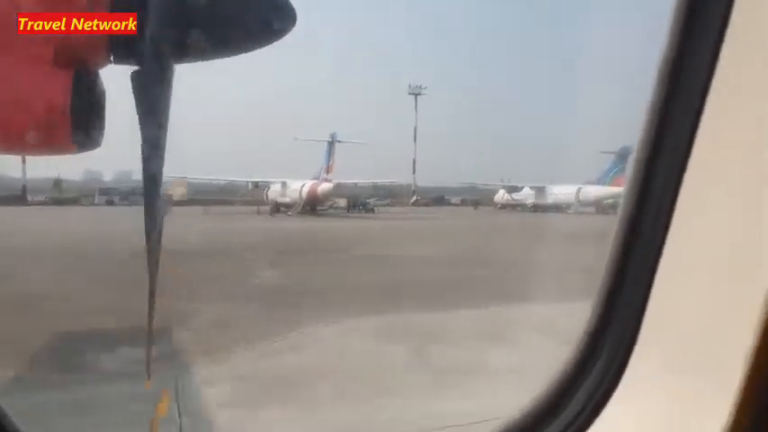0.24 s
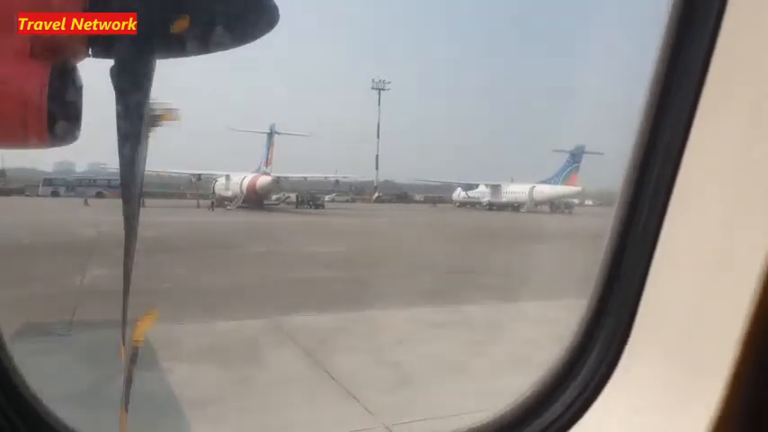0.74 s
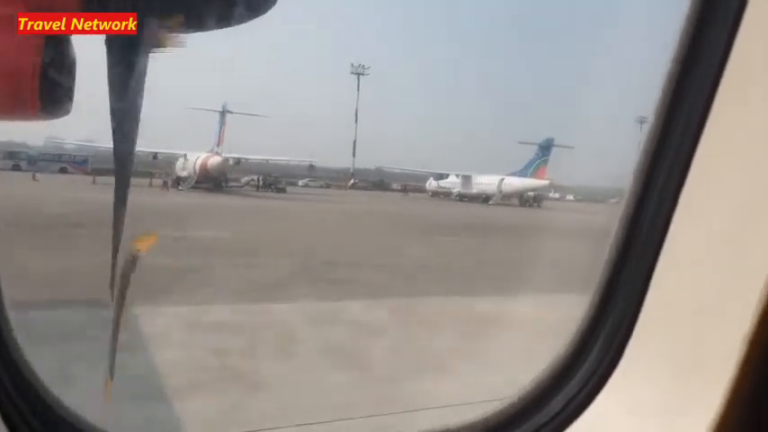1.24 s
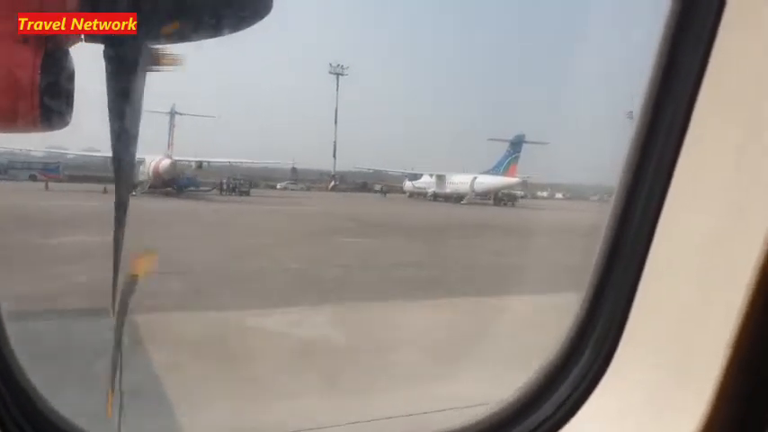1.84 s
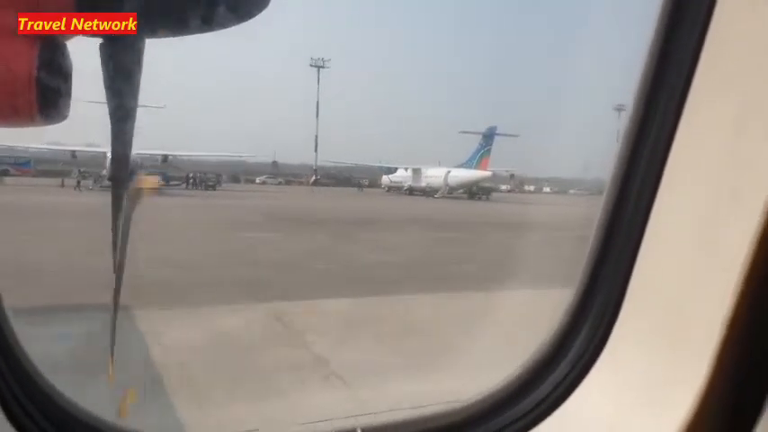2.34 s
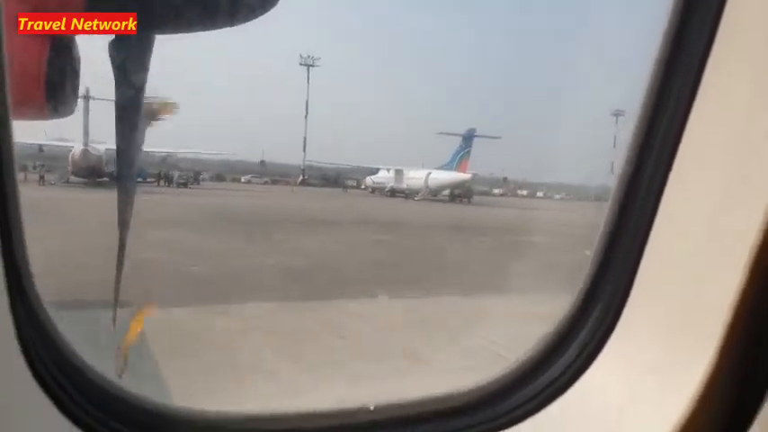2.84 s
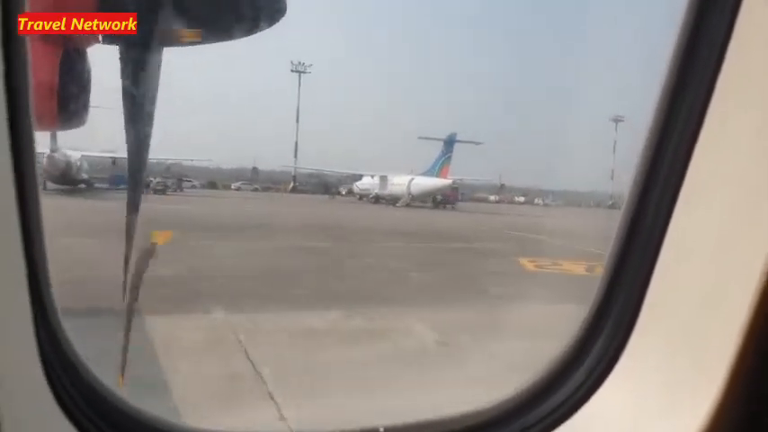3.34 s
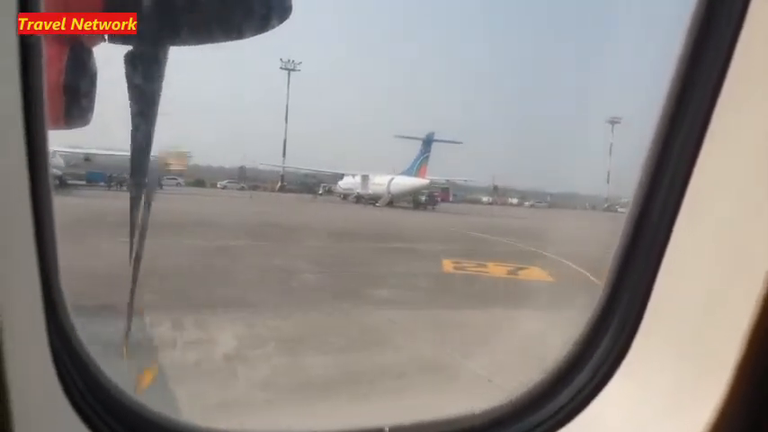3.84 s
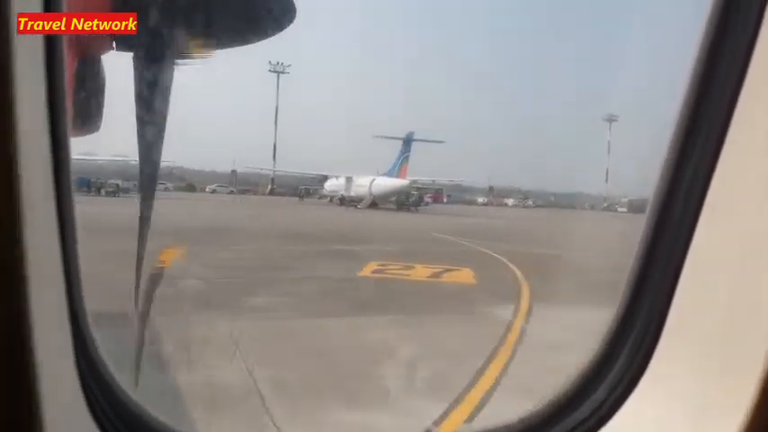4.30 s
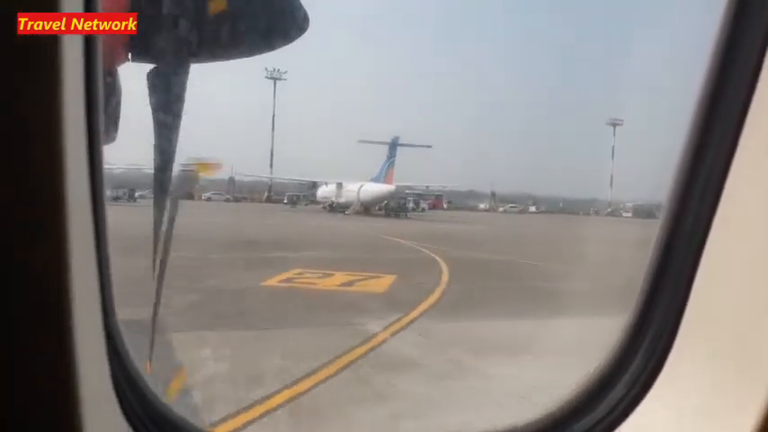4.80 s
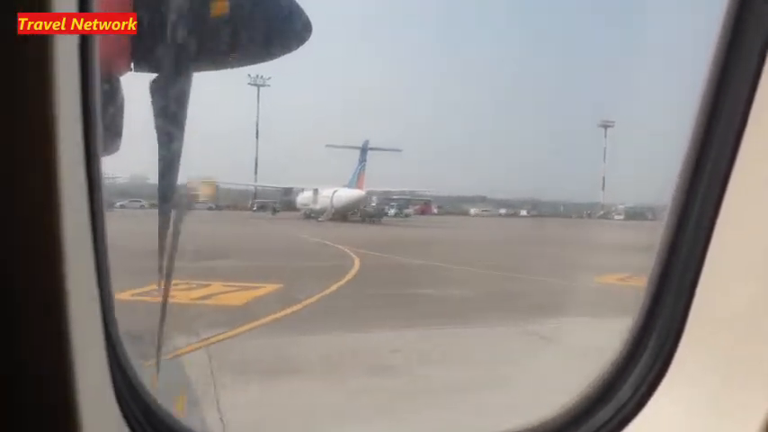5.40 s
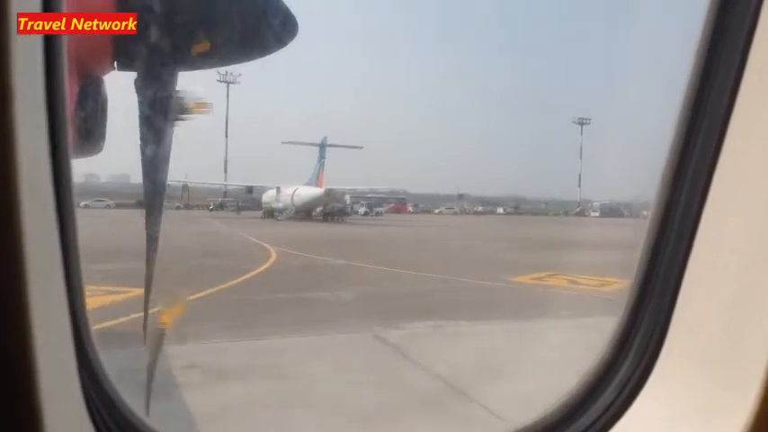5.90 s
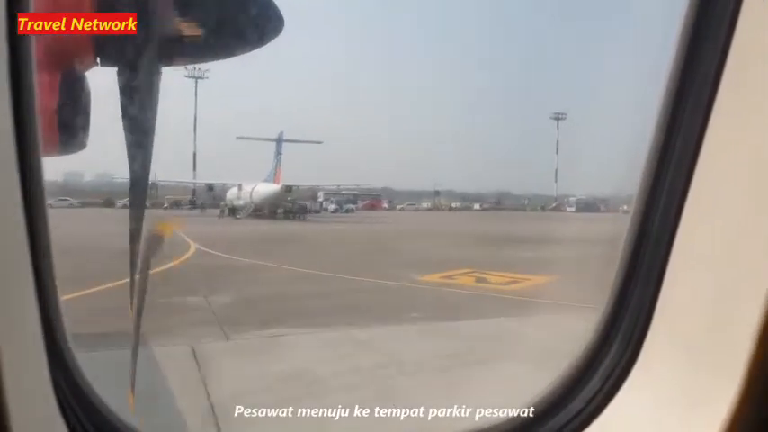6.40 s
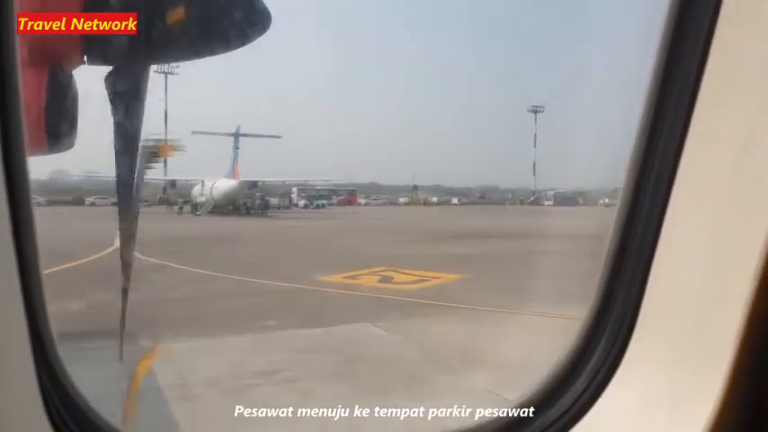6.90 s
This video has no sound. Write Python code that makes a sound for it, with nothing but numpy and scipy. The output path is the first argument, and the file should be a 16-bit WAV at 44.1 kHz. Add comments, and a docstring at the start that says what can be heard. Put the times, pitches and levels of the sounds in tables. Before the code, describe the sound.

Continuous turboprop drone heard through the cabin wall during slow taxiing. The sound is bass-heavy and muffled: a blurred propeller hum, lumpy low rumble and booming that surge and dip several times a second. Soft cabin air and engine hiss flickers far underneath, with barely noticeable machinery whine and short faint puffs. The handheld microphone sits near the window, giving an enclosed, full stereo sound with little echo.

```python
"""Propeller of a taxiing turboprop, heard in the cabin by the window: blades chop turbulent air into fuzzy
noise humps at multiples of the blade rate, over a gusting wash. The fuselage adds rumble, boom and a
blade-rate throb as noise bands; faint machinery sines whine over the flickering noise of engine and
cabin air, with short flares and whooshes. Two microphone ports hear the bass alike and the treble apart."""
import sys
import numpy as np
from scipy import signal
from scipy.fft import rfft, irfft, next_fast_len
from scipy.io import wavfile
from scipy.ndimage import uniform_filter1d

SR = 44100
rng = np.random.default_rng(int(sys.argv[2]) if len(sys.argv) > 2 else 0)


def waveform_to_disk(signal):
    """Save audio, clipped to [-1, 1], as 16-bit WAV at the path in sys.argv[1]."""
    frames = np.transpose(np.atleast_2d(signal))
    scaled = np.clip(frames, -1, 1) * 32767
    samples = np.round(scaled).astype(np.int16)
    wavfile.write(sys.argv[1], SR, samples)


N = 315315
BLADE_HZ = 83.23

# swell of hiss, machinery and wash: [t/s, hiss level/dB, wash re hiss/dB before trim and gusts]
SWELL = [(0.0, -44.5, 25.5), (0.45, -44.5, 23), (0.89, -45.5, 23), (1.34, -43, 25), (1.79, -42.5, 21.5),
         (2.23, -42.5, 25), (2.68, -44, 25), (3.13, -44, 22), (3.58, -44, 24), (4.02, -42.5, 24.5),
         (4.47, -43, 25.5), (4.92, -42.5, 22.5), (5.36, -42, 25), (5.81, -43, 22), (6.26, -42.5, 25),
         (6.7, -43, 23), (7.15, -43, 25.5)]


def propeller():
    """Blades cut each eddy in turn: noise gathers at blade-rate multiples, long eddies give narrow cores."""
    # humps: [multiple of blade rate, relative density/dB, width/Hz above the top, core power re hump/dB]
    blades = [(2, 1.5, 5.66, -0.5), (3, -0.5, 14, 2.5), (4, -8.5, 18.5, 0), (5, -9, 15.1, 0.5),
              (6, -19, 31.6, 4.5), (7, -25, 24, 1), (8, -28, 13.6, -10), (9, -29.5, 17.6, -10),
              (10, -37, 15, -4), (11, -40.5, 22, -6)]
    # slow hump levels: [t/s, relative level/dB of multiples 2, 3, 4, 5, 6 and above]
    cores = [(0.0, 1, -4, -10, -1.5, 2), (0.36, -10, -1.5, 1.5, -3.0, -1.5),
             (0.72, -14, 0.5, -10, -2.5, -1.5), (1.08, 0, -3, -2.5, -1.5, 0.0), (1.44, 0, 1.0, 2, 0, -1.5),
             (1.8, 2, 0.5, -3.5, 0.5, 0.0), (2.16, 5, 0.0, 6, -2, 0), (2.52, 3.5, -1, -1.5, -2, -1),
             (2.88, 6, 3.5, -3.5, 1.5, 2.5), (3.24, 2.5, -4.5, 0.5, -6, -2), (3.6, 3.5, -2, -2, 0.5, -0.5),
             (3.96, -6, -1, 5.5, -3, 2), (4.32, 0.5, -0.5, 0, -3.5, 1), (4.68, 0, 3.5, 1.0, -0.5, -2.5),
             (5.04, -5, 1.5, -2, 3.5, 1.5), (5.4, 1, 1.5, 2, -3.5, 1.5), (5.76, 0, 0.5, 2, 3.5, 1),
             (6.12, -4, 2.5, 5.0, 1.5, 1), (6.48, -8, 1, -4.5, 1.5, 1.5), (6.84, 5.5, 2, 3.5, -2.5, 1.5),
             (7.15, -5, -1.0, -3, -6, 0)]
    # wash between the humps: [f/Hz, relative density/dB per Hz]
    wash_shape = [(110, -15.5), (145, -4), (200, -5), (240, -10), (270, -12), (360, -16), (450, -20),
                  (530, -26.5), (625, -25.5), (700, -33), (1000, -59), (1400, -74), (3000, -110)]
    low_side = 2.33  # width ratio, below the top to above
    core_share = 0.37  # core width re hump width
    weave_db, weave_hz = 2, 4.6
    pitch_drift, drift_hz = .005, 1.597  # rms share of pitch, common to all humps
    humps_db, wash_trim_db = -22.5, -3
    gust_db, gust_hz = 1.03, 6.1

    total = sum(gain_of(2 * db) * width_hz for _, db, width_hz, _ in blades)
    humps = 0
    for multiple, db, width_hz, core_db in blades:
        top_hz = multiple * BLADE_HZ

        def spectrum(hz):
            broad = hump(hz, top_hz, width_hz, low_side)
            core = hump(hz, top_hz, core_share * width_hz) / core_share
            return np.sqrt(broad + gain_of(2 * core_db) * core)

        band = steadied(noise(spectrum), .2)
        slow_db = over_time(cores, column=min(multiple - 1, 5))
        level_db = db + slow_db + weave_db * wander(weave_hz)
        humps = humps + gain_of(level_db) * np.sqrt(width_hz / total) * band

    # uneven reading speed drifts the pitch
    position = np.arange(N) + np.cumsum(pitch_drift * wander(drift_hz))
    humps = np.array([np.interp(position, np.arange(N), port) for port in humps])

    wash = steadied(shaped_noise(wash_shape), 0.21)
    wash_db = over_time(SWELL, column=1) + over_time(SWELL, column=2)
    wash_db = wash_db + wash_trim_db + gust_db * wander(gust_hz)
    return gain_of(humps_db) * humps + gain_of(wash_db) * wash


def fuselage():
    """Broad rumble, narrower boom and blade-rate throb: noise bands that vary apart and surge together."""
    # rumble: [f/Hz, relative density/dB per Hz]
    rumble_shape = [(12, -34), (25, -27), (38, -13), (48, -11), (58, 1), (65, 2), (74, -2), (80, -5),
                    (93, -7), (103, -7), (115, -25), (200, -90)]
    # boom resonances: [f/Hz, width/Hz, relative density/dB]
    boom_modes = [(110, 11, -6.5), (126, 10.3, -3), (135, 16, -13)]
    # steadier narrow note inside the boom: [f/Hz, width/Hz, level re boom/dB]
    boom_core = (125.6, 4, -3)
    # slow levels before lumps and surges: [t/s, rumble/dB, boom/dB, throb/dB]
    bass = [(0.0, -15, -20.5, -14), (0.15, -27, -21, -33), (0.3, -33, -21, -17.5), (0.45, -29, -18.0, -35),
            (0.6, -21, -19, -31), (0.75, -22, -17, -22), (0.9, -10.5, -26, -19), (1.05, -30, -18, -22.0),
            (1.2, -26, -24, -21.5), (1.35, -19, -14.5, -23.5), (1.5, -21.5, -22.5, -30),
            (1.65, -17.5, -16, -21), (1.8, -22, -20, -27), (1.95, -19, -15.5, -19), (2.1, -25, -20.5, -27),
            (2.25, -15, -17.5, -21), (2.4, -17.5, -18, -18), (2.55, -16, -16.5, -19), (2.7, -21, -23, -27),
            (2.85, -21, -18, -28.0), (3.0, -23, -18.0, -26.0), (3.15, -24.0, -17.5, -19.5),
            (3.3, -25, -20.5, -22), (3.45, -23, -21.5, -31), (3.6, -21, -19, -23),
            (3.75, -23.5, -13.5, -31), (3.9, -19.5, -25.5, -30.0), (4.05, -22, -22, -34),
            (4.2, -20, -21, -26), (4.35, -18, -23.5, -16.5), (4.5, -29, -20, -27), (4.65, -18, -18.5, -19),
            (4.8, -15.5, -15.5, -29), (4.95, -20, -14, -35), (5.1, -28, -16.5, -33),
            (5.25, -20.5, -19, -24.0), (5.4, -20, -18, -13.5), (5.55, -25, -21, -23),
            (5.7, -22, -18.5, -23), (5.85, -26, -13.5, -35), (6.0, -31, -19, -26), (6.15, -17.5, -19, -27),
            (6.3, -27, -17.5, -25), (6.45, -21.5, -29, -20), (6.6, -22, -20, -28.0),
            (6.75, -21, -17.5, -31), (6.9, -26, -17.5, -22), (7.05, -24, -13.5, -28.5),
            (7.15, -32, -14, -34)]
    # brief surges and dips: [t/s, change/dB]
    surges = [(.23, -11), (.65, -8), (.72, 3.5), (1.39, -15), (1.62, 3), (2.17, 8.5), (2.44, 3), (3.31, 10),
              (3.36, -9), (3.77, 0), (3.91, -4), (4.88, -9), (4.98, 4.5), (5.8, -6), (6.18, 5), (6.27, 5.5),
              (6.52, -9)]
    surge_s = 0.025  # half length, to 1/e of the change
    lump_db, lump_hz = 0.5, 11.6
    throb_width_hz = 7

    def boom_spectrum(hz):
        return np.sqrt(sum(gain_of(2 * db) * hump(hz, top_hz, width_hz) for top_hz, width_hz, db in boom_modes))

    def lumpy_gain(column):
        return gain_of(over_time(bass, column) + lump_db * wander(lump_hz))

    t = np.arange(N) / SR
    surge_db = sum(db * np.exp(-((t - s) / surge_s) ** 2) for s, db in surges)

    rumble = steadied(shaped_noise(rumble_shape), 0.064)
    boom = steadied(noise(boom_spectrum), 0.09)
    note_hz, note_width_hz, note_db = boom_core
    note = steadied(noise(lambda hz: np.sqrt(hump(hz, note_hz, note_width_hz))), 0.32)
    boom = boom + gain_of(note_db) * note
    throb = steadied(noise(lambda hz: np.sqrt(hump(hz, BLADE_HZ, throb_width_hz))), 0.23)

    bass_sum = lumpy_gain(1) * rumble + lumpy_gain(2) * boom + lumpy_gain(3) * throb
    return gain_of(surge_db) * bass_sum


def machinery():
    """Thin sine tones whose strength and phase waver at random."""
    # tones: [f/Hz, level re hiss/dB, waver rate/Hz, left-right/dB, rms level waver/dB]
    tones = [(206.1, 9.5, 3.5, 2.5, 4), (375.5, -4, 2.2, 4, 4), (1030.4, -16, 1.6, 3, 2),
             (1236, -26, 4, 1.5, 4), (1509, -25, 5, 6, 4), (5156, -28, 15, -1.5, 4)]
    phase_waver_rad = 1.16  # rms
    t, out = np.arange(N) / SR, np.zeros((2, N))
    for hz, db, waver_hz, lean_db, waver_db in tones:
        phase = 2 * np.pi * hz * t + phase_waver_rad * wander(waver_hz)
        tone = np.sin(phase) * gain_of(db + waver_db * wander(waver_hz))
        sides = gain_of([[lean_db / 2], [-lean_db / 2]])
        out += np.sqrt(2) * tone * sides
    return out


def hiss():
    """Engine and air noise in two patchy bands that flicker together, the top more than the middle."""
    # middle band: [f/Hz, relative density/dB per Hz]
    middle_shape = [(300, -50), (800, 3), (1060, 1.5), (1140, 1), (1280, -2.5), (1450, -1), (1860, -3.5),
                    (2100, -1), (2450, -2.5), (2750, -3.5), (3100, -5.5), (3900, -6.5), (4320, -3),
                    (5200, -8), (5750, -5.5), (6300, -10.5), (7500, -11), (8500, -36.5)]
    # thin top band: [f/Hz, relative density/dB per Hz]
    top_shape = [(6500, -40), (7800, 1), (8200, 1), (9800, -2), (10800, 1), (13500, -1), (14300, -3),
                 (15000, -6), (15300, -11), (16000, -12)]
    top_db = -14.5
    flicker = evened(wander(22) + .4 * wander(80))
    middle = patchy(shaped_noise(middle_shape), depth_db=1.1, wide_db=0.68)
    top = patchy(shaped_noise(top_shape), depth_db=2.4, wide_db=.6)
    top = gain_of(.8 * flicker + .4 * wander(20)) * top
    return gain_of(0.52 * flicker) * middle + gain_of(top_db) * top


def flares():
    """Short bright flares and longer dull whooshes: noise bursts with a quick rise and softer fall."""
    # flares: [onset t/s, level/dB]
    flare_onsets = [(0.022, -43), (1.608, -44), (1.925, -44), (2.004, -42), (2.291, -47), (2.335, -43.5),
                    (2.916, -45), (4.238, -43), (5.135, -45), (5.298, -50.5), (5.381, -45), (6.1, -45),
                    (6.49, -48), (6.873, -50)]
    # flare colour: [f/Hz, relative density/dB per Hz]
    flare_shape = [(600, -50), (1600, 0), (3000, -5), (6000, -9), (9000, -16), (15000, -21)]
    # whooshes: [onset t/s, level/dB, rise/s]
    whooshes = [(.025, -42.5, 0.02), (.5, -50, 0.028), (.61, -47, 0.015), (.69, -47, .012),
                (1.36, -50, .015), (1.58, -53, 0.033), (2.27, -49.5, .025), (2.45, -47, 0.016),
                (3.68, -48, 0.019), (4.28, -51, .015), (4.74, -47, 0.02), (5.5, -47, 0.014)]
    # whoosh colour: [f/Hz, relative density/dB per Hz]
    whoosh_shape = [(700, -40), (1250, 1), (1650, 0), (2500, -1), (3200, -8), (4000, -11), (6000, -12),
                    (8000, -36)]
    flare_rise_s = 0.0079
    flare_rows = [(s, db, flare_rise_s) for s, db in flare_onsets]
    return bursts(flare_rows, flare_shape) + bursts(whooshes, whoosh_shape)


def bursts(rows, colour):
    """Coloured noise under envelopes that peak rise_s after onset; rows of (s, level dB, rise s)."""
    t, envelope = np.arange(N) / SR, np.zeros(N)
    for s, db, rise_s in rows:
        u = np.maximum(t - s, 0) / rise_s
        envelope += gain_of(db) * u * np.exp(1 - u)
    return envelope * shaped_noise(colour)


def noise(gain):
    """Noise of amplitude spectrum gain(hz) at the two ports; their mean has unit rms."""
    # likeness of the ports: [f/Hz, correlation before the phase lead]
    likeness = [(60, .995), (200, .985), (290, .93), (400, .7), (550, .47), (650, .36), (800, .33),
                (920, .2), (1050, 0), (1250, -.26), (1800, -.3), (2700, .15), (3700, -.25), (7000, -.24),
                (8800, -.05), (10000, .2), (11200, .02), (15000, .13)]
    # level balance: [f/Hz, left-right/dB]
    lean = [(40, 1.8), (110, 2.4), (280, 2.7), (420, 8.5), (520, 6.5), (700, 6.3), (1050, -1.2),
            (4500, -1.8), (5700, -5.5), (6800, -1.9), (15000, -1.3)]
    # phase lead of the right port: [f/Hz, phase/rad]
    lead = [(60, -.15), (200, -.15), (330, 0), (450, .6), (550, .65), (650, 1.4), (770, 2.4), (1030, 2.6),
            (1070, 0), (15000, 0)]
    size = next_fast_len(N)
    hz = np.fft.rfftfreq(size, 1 / SR)
    left, other = rfft(rng.standard_normal((2, size)))
    same = np.clip(read(likeness, hz), -1, 1)
    right = same * left + np.sqrt(1 - same ** 2) * other
    right = right * np.exp(1j * read(lead, hz))
    half = gain_of(read(lean, hz) / 2)
    pair = irfft(gain(hz) * np.array([left * half, right / half]), size)[:, :N]
    return pair / np.std(pair.mean(0))


def shaped_noise(points):
    """Port-pair noise with the spectrum of a (Hz, dB per Hz) table."""
    return noise(lambda hz: gain_of(read(points, hz)))


def hump(hz, top_hz, width_hz, low_side=1):
    """Power of a resonance-shaped band with its top at 1, low_side times wider below the top."""
    width_hz = np.where(hz < top_hz, low_side * width_hz, width_hz)
    return 1 / (1 + (2 * (hz - top_hz) / width_hz) ** 2) ** 2


def steadied(pair, span_s):
    """Evens out the level over spans of span_s, so that a curve can set it."""
    size = max(round(span_s * SR), 1)
    power = uniform_filter1d(uniform_filter1d(pair.mean(0) ** 2, size), size)
    return pair / np.sqrt(power + 0.038)  # the floor limits the lift of gaps


def patchy(pair, depth_db, wide_db):
    """Lifts and lowers small and large patches of time and frequency at random, alike at both ports."""
    _, _, z = signal.stft(pair, nperseg=512)
    small, wide = rng.standard_normal(z.shape)
    small = uniform_filter1d(uniform_filter1d(small, size=3, axis=0), size=6, axis=1)
    wide = uniform_filter1d(uniform_filter1d(wide, size=7, axis=0), size=40, axis=1)
    patch_db = depth_db * evened(small) + wide_db * evened(wide)
    return signal.istft(z * gain_of(patch_db), nperseg=512)[1][:, :N]


def wander(top_hz):
    """Slow random curve of unit rms, mostly below top_hz."""
    hz = np.fft.rfftfreq(N, 1 / SR)
    return evened(irfft(rfft(rng.standard_normal(N)) / (1 + (hz / top_hz) ** 4), N))


def over_time(table, column):
    """One column of a curve table, a value per sample."""
    rows = np.array(table)
    return np.interp(np.arange(N) / SR, rows[:, 0], rows[:, column])


def read(points, hz):
    """Reads a table along log frequency."""
    f, value = np.transpose(points)
    return np.interp(np.log(hz + 1), np.log(f + 1), value)


def evened(x):
    """Scales to unit rms."""
    return x / np.sqrt(np.mean(x ** 2) + 1e-20)


def gain_of(db):
    """Decibels to amplitude."""
    return 10 ** (np.asarray(db) / 20)


def scene():
    """Propeller and surging fuselage bass, with machinery and hiss swelling together, and flares."""
    swelling = gain_of(over_time(SWELL, column=1)) * (machinery() + hiss())
    return propeller() + fuselage() + swelling + flares()


def record(dry):
    """Soft ceiling at full scale, then a linear-phase low-pass."""
    edge_hz = 15720
    held = dry / (1 + abs(dry) ** 12) ** (1 / 12)
    held = np.pad(held, [(0, 0), (511, 511)], "reflect", reflect_type="odd")
    low_pass = signal.firwin(1023, edge_hz, window=("kaiser", 9), fs=SR)
    return signal.oaconvolve(held, low_pass[None], "valid")


dry = scene()
out = record(dry)
waveform_to_disk(out)
```